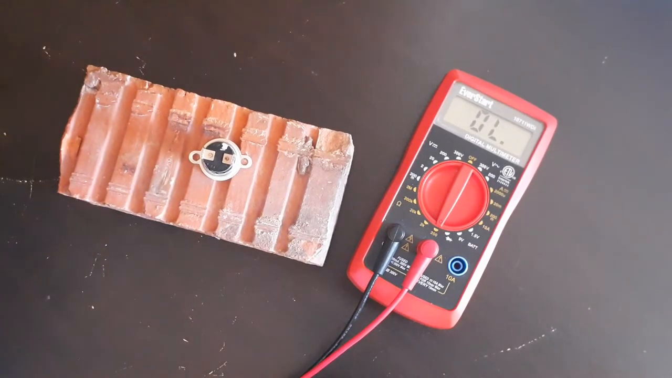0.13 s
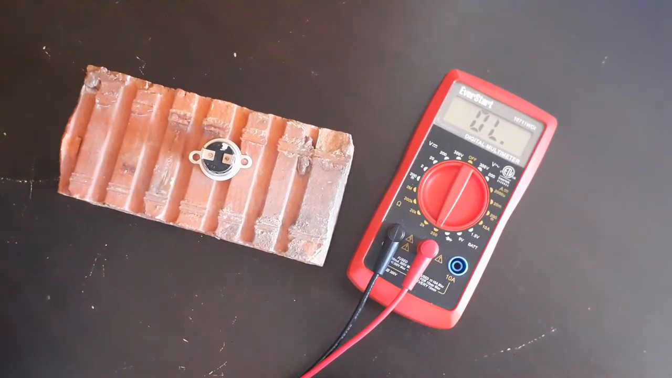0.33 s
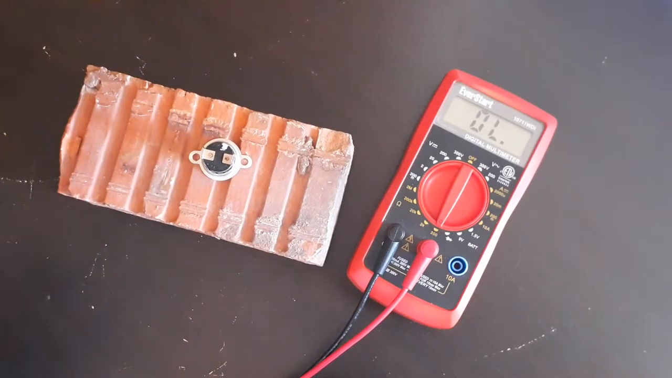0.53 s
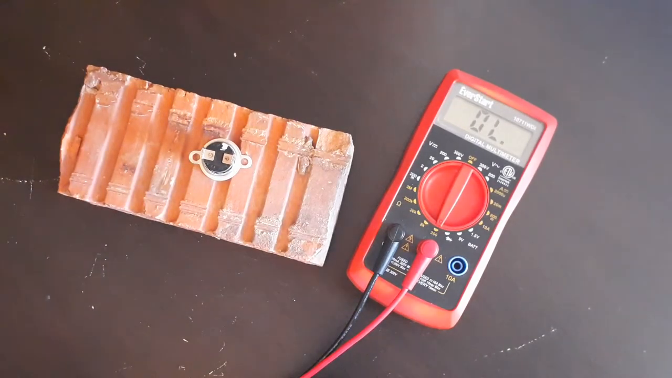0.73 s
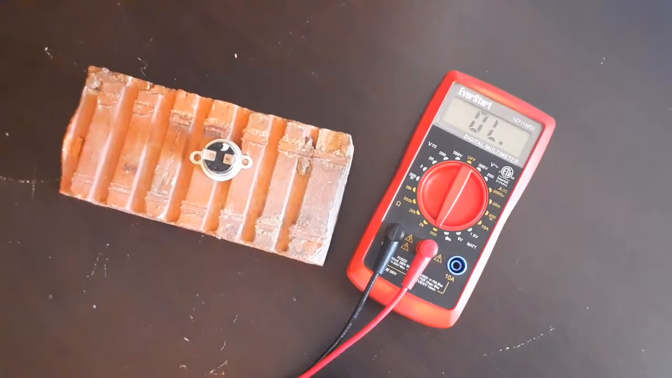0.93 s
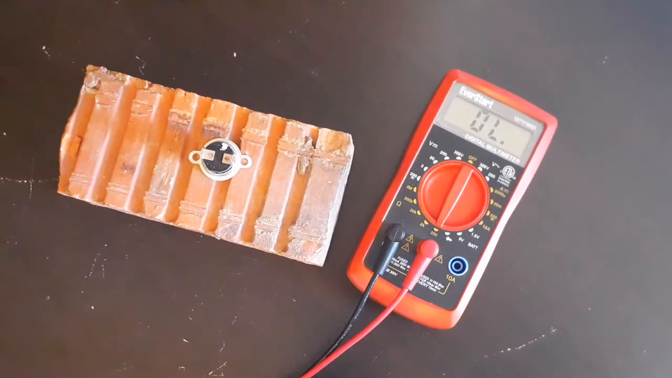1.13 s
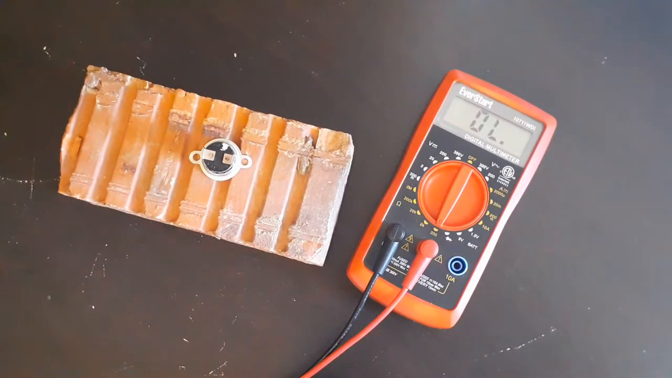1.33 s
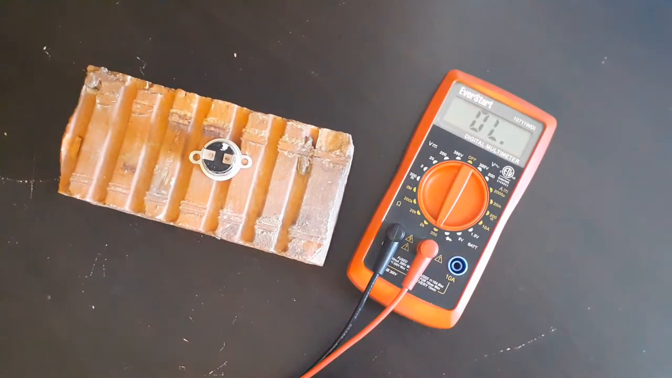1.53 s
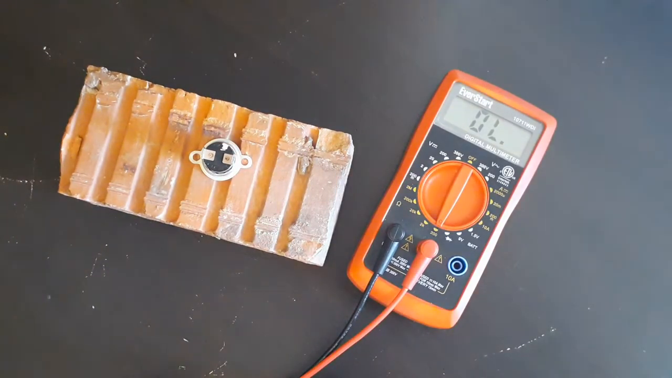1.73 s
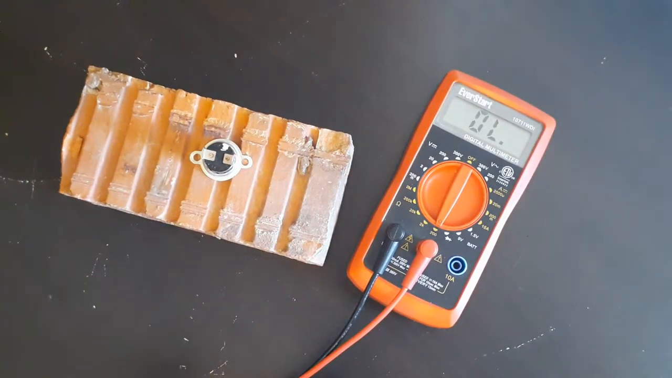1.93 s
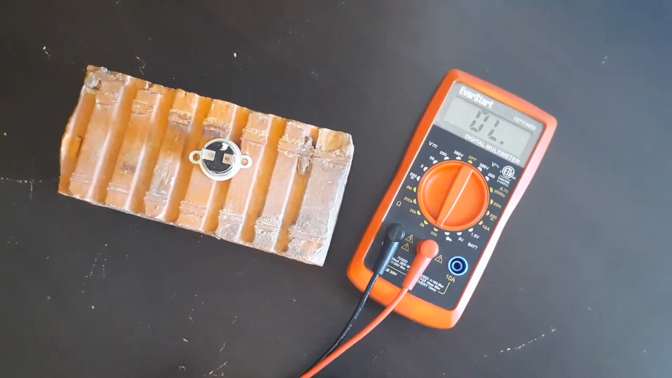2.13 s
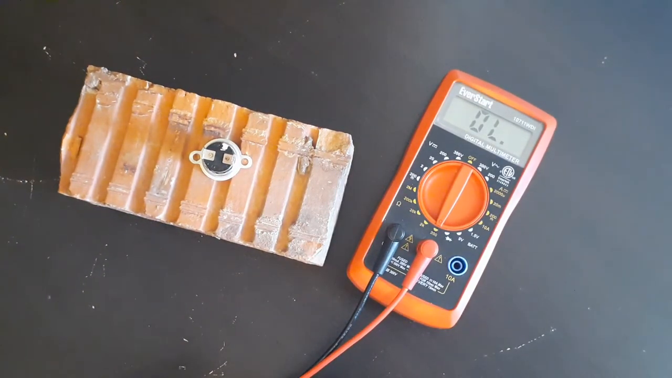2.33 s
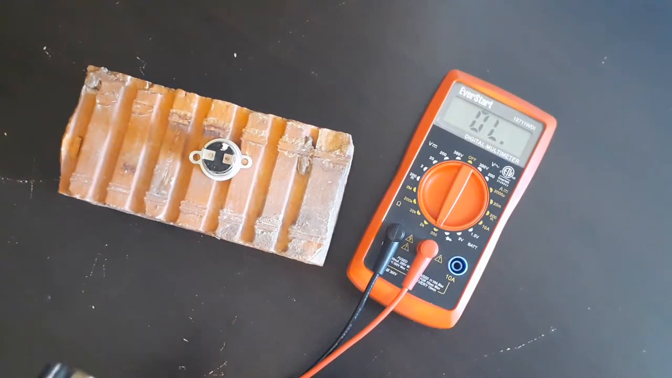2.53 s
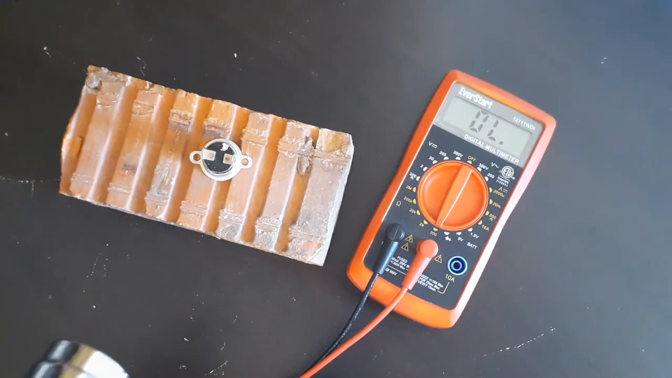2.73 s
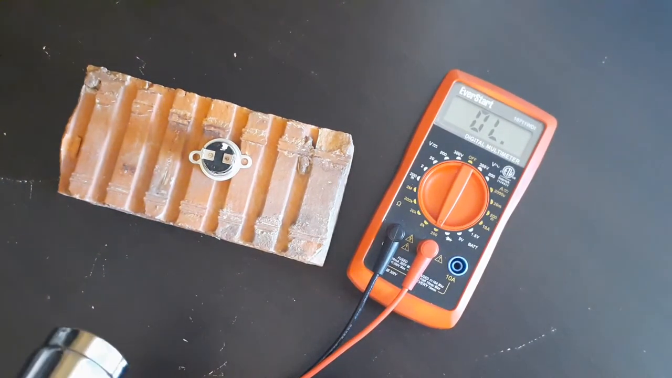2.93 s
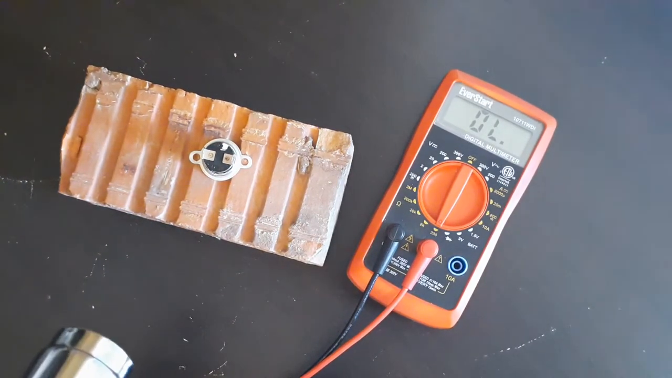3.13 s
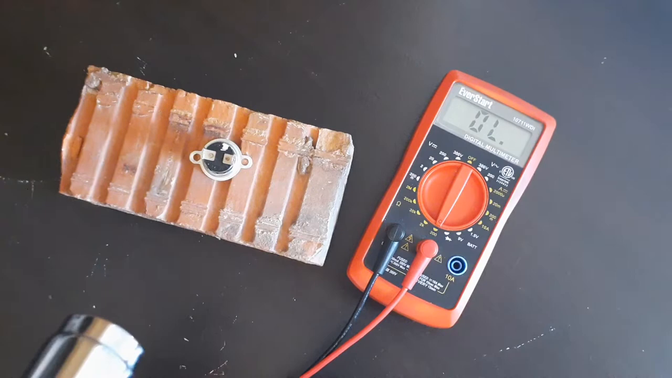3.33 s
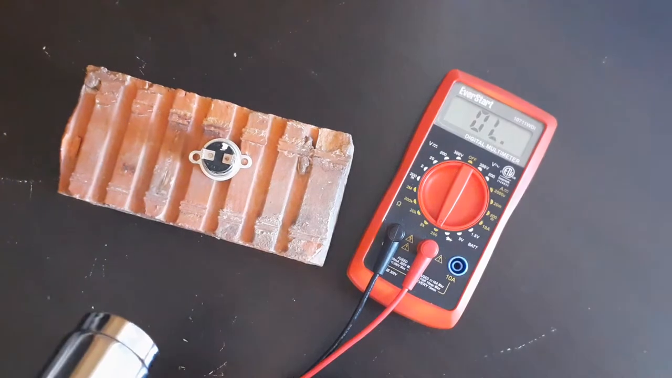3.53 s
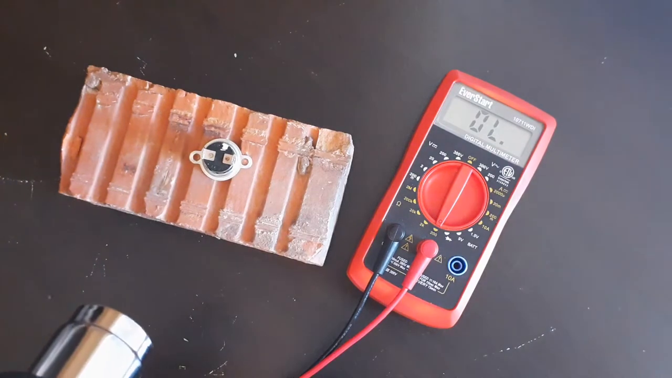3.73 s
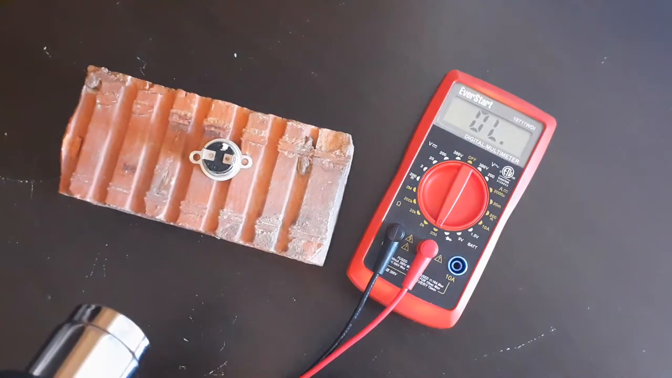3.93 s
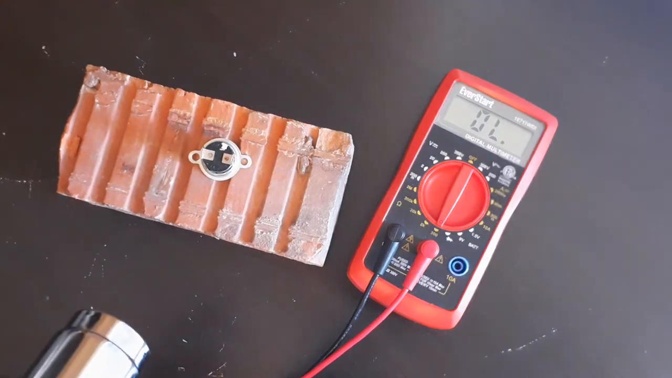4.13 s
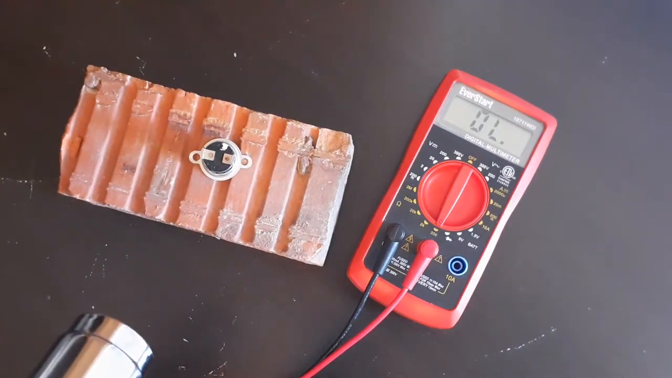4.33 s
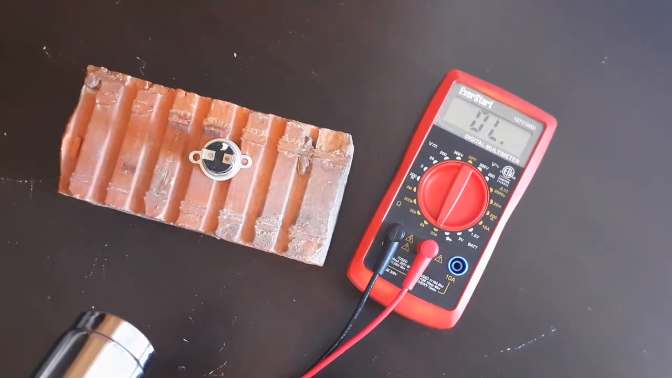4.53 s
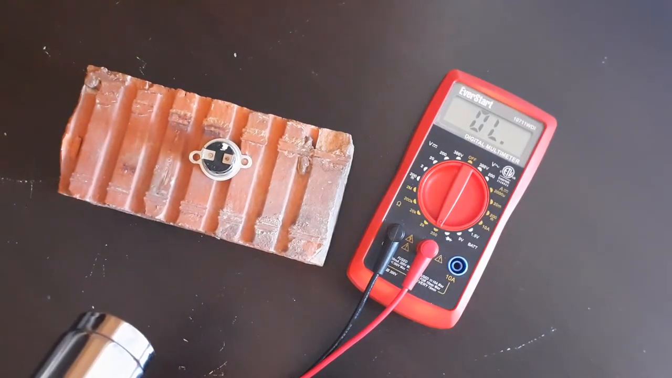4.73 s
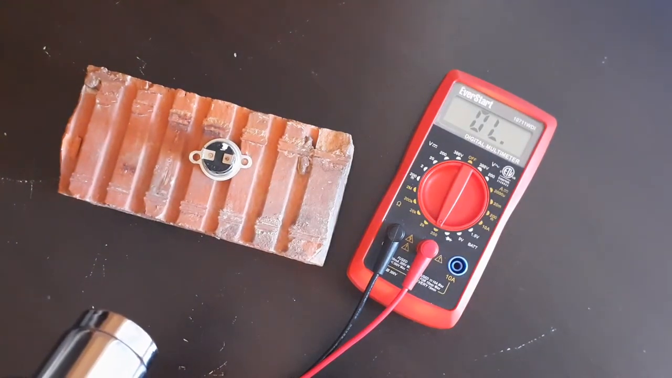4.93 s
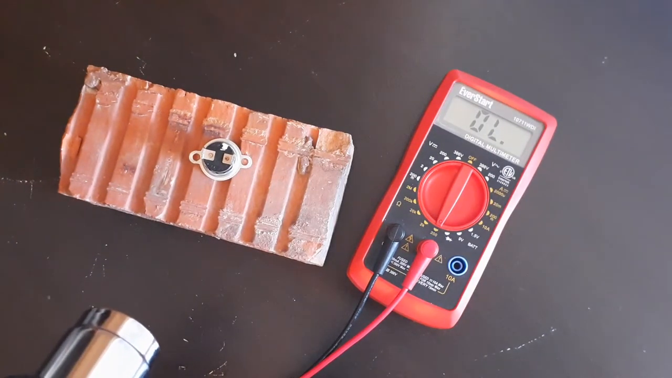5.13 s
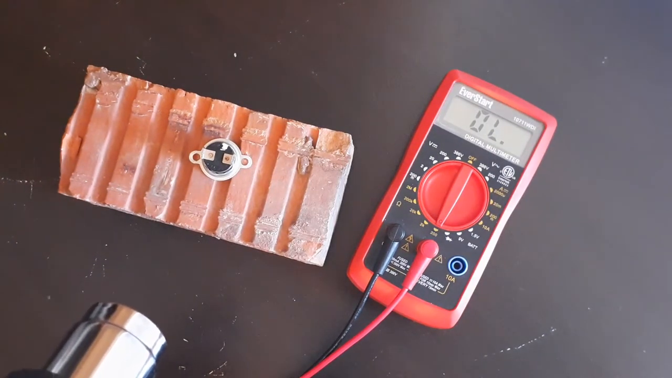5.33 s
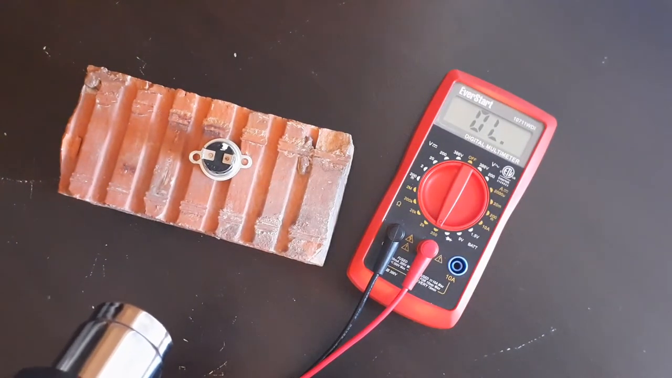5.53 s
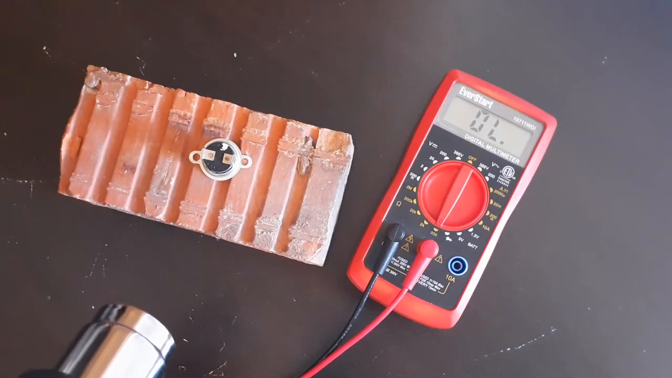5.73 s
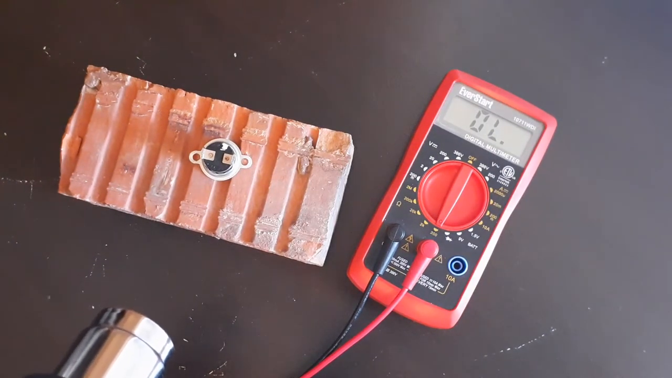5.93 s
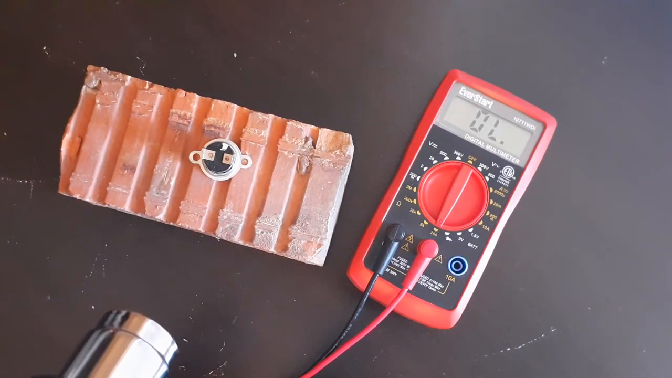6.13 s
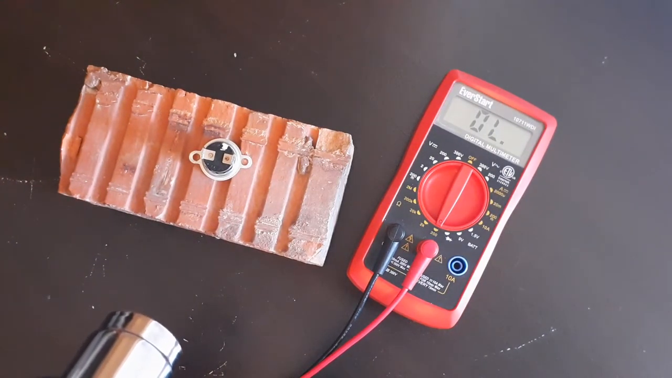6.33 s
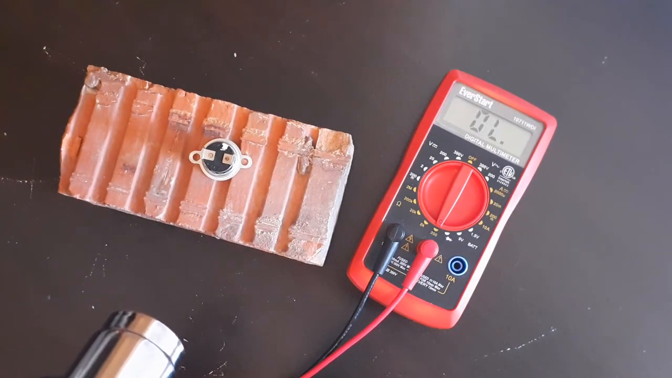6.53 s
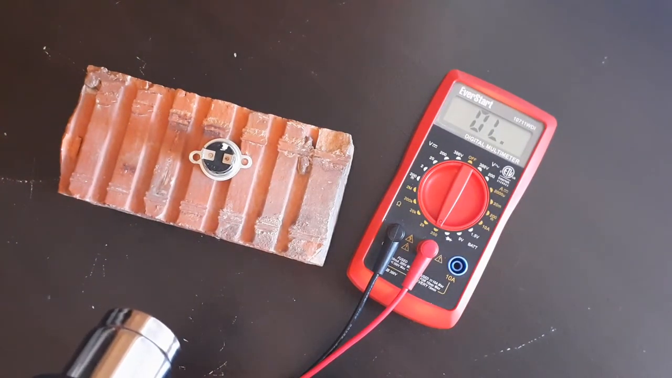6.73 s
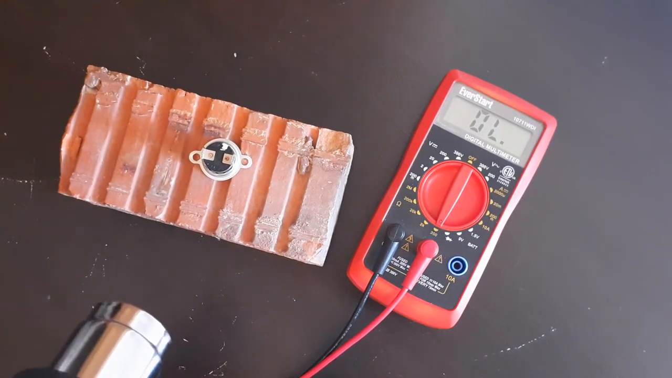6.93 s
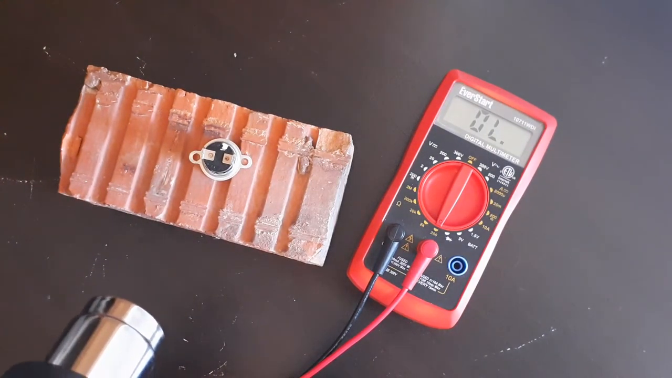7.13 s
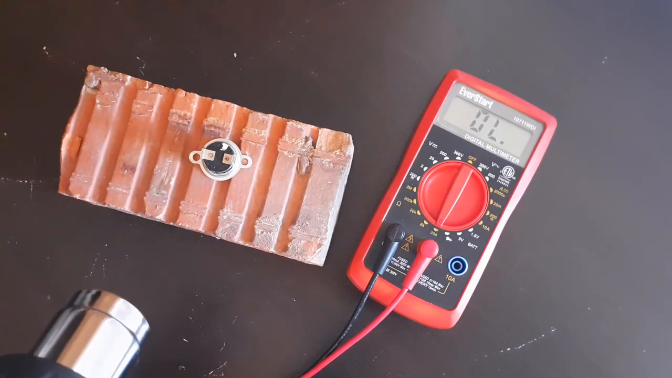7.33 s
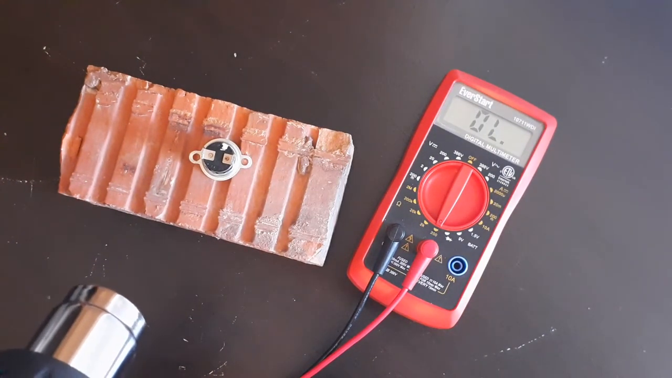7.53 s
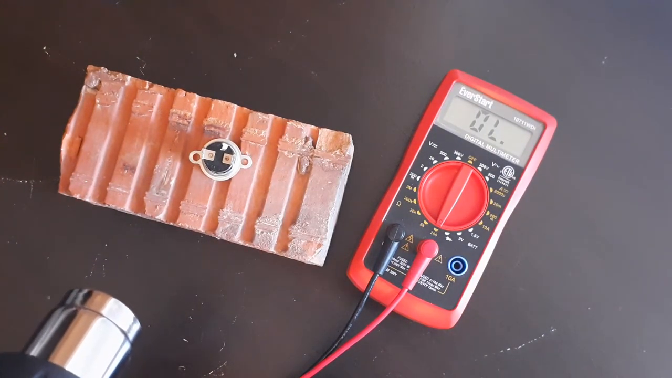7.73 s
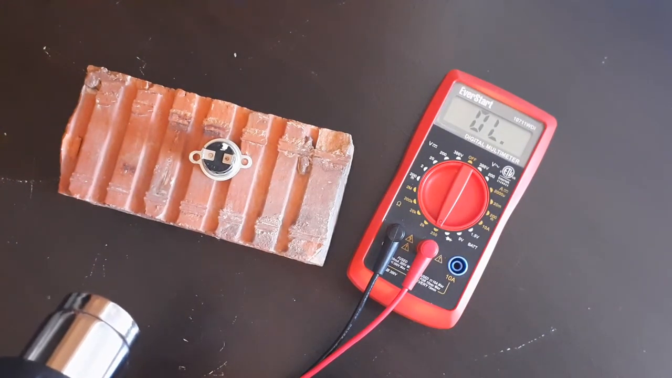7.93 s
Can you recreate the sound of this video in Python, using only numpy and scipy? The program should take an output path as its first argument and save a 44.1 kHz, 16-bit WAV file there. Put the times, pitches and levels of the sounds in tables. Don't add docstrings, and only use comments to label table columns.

```python
import sys
import numpy as np
from scipy import signal
from scipy.fft import rfft, irfft, next_fast_len
from scipy.io import wavfile

SR = 44100
rng = np.random.default_rng(int(sys.argv[2]) if len(sys.argv) > 2 else 0)


def invert_db(x):
    u = np.asarray(x, float) / 20
    return 10 ** u


def log_audio(samples):
    frames = np.atleast_2d(samples).T
    limited = np.clip(frames, -1, 1)
    pcm = np.round(limited * 32767).astype(np.int16)
    wavfile.write(sys.argv[1], SR, pcm)


N = 356636
MOTOR_ON_S = 1.6
TOP_TURNS_PER_S = 238.21


def motor():
    speed = rotor_speed()
    turns = np.cumsum(speed) / SR
    tones = hum(speed, turns) + blade_whine(turns) + overtones(speed, turns)
    return np.sqrt(2) * tones * motor_running() + brushes(turns)


# missing_speed [turns per s], time_constant [s]
SPIN_UP = [
    (148.2, .798),
    (70.4, 1.394),
]


def rotor_speed():
    running_s = np.maximum(np.arange(N) / SR - MOTOR_ON_S, 0)
    return TOP_TURNS_PER_S - sum(missing * np.exp(-running_s / lag_s) for missing, lag_s in SPIN_UP)


def motor_running():
    return np.arange(N) > MOTOR_ON_S * SR


# pitch_hz [Hz], width_hz [Hz], left_db [dB], right_db [dB]
HUM_MODES = [(187, 18, -60, -54), (228.5, 12, -44, -64), (233, 8.7, -65, -43.5)]


def hum(speed, turns):
    power = 0
    for pitch_hz, width_hz, left_db, right_db in HUM_MODES:
        power = power + invert_db(ports(left_db, right_db)) ** 2 * resonance(speed, pitch_hz, width_hz)
    return np.sqrt(power) * np.sin(2 * np.pi * turns + ports(0.84, 0))


# time_s [s], left_db [dB], right_db [dB], left_port_lead [cycles]
WHINE = [(1.76, -67, -65, .35), (2.05, -47, -47, .2), (2.33, -49, -41, .25), (2.5, -43, -37, .7),
         (2.74, -35, -37, .12), (3.25, -29, -35, .43), (3.7, -29, -29, .5), (3.84, -28, -28, .69),
         (3.97, -24, -38, .42), (4.14, -28, -26, .33), (4.23, -28, -27, .55), (4.65, -29, -27, .44),
         (4.86, -30, -26, .63), (5.52, -27, -26, .58), (5.72, -30, -24, .5), (5.9, -33, -25, .65),
         (6.88, -33, -28, .64), (7.2, -31, -29, .74)]
# time_s [s], width_s [s], left_db [dB], right_db [dB]
WHINE_FADES = [(2.22, .05, -5, 0), (2.42, .04, -3, -8), (2.87, .04, -5, -4), (3.08, .1, -3, -4),
               (3.44, .05, -3, 0), (3.63, .06, 0, -6), (4.2, .07, -6, 0), (4.55, .08, 0, -3),
               (4.81, .07, -7, 0), (5.2, .2, -3, -3), (5.6, .06, 0, -2), (6.98, .07, -7, -1)]


def blade_whine(turns):
    t = np.arange(N) / SR
    left_db, right_db, lead = in_time(WHINE)
    fade_db = 0
    for time_s, width_s, fade_left, fade_right in WHINE_FADES:
        fade_db = fade_db + ports(fade_left, fade_right) * np.exp(-((t - time_s) / width_s) ** 2)
    flutter = invert_db(1.2 * np.array([drift(14), drift(14)]) + .2)
    lead = lead + .02 * drift(6)
    level = invert_db(np.array([left_db, right_db]) + fade_db) * flutter
    whine = level * np.sin(2 * np.pi * (12 * turns + lead * ports(1, 0)))
    copy_level = invert_db((left_db + right_db) / 2 - 24 + 2 * drift(8))
    return whine + copy_level * np.sin(2 * np.pi * (12 * turns + lead / 2 + .5))


# multiple [times rotor speed], left_db [dB], right_db [dB]
OVERTONES = [(2, -52, -55), (5, -53, -52), (20, -60, -54), (23, -59, -57), (24, -59, -62), (25, -58, -61),
             (36, -61, -58), (40, -61, -66), (41, -60, -63), (42, -62, -65), (53, -64, -69), (61, -63, -69),
             (65, -68, -78)]


def overtones(speed, turns):
    out = np.zeros((2, N))
    wavers = [invert_db(4.4 * drift(7.0)) for _ in range(6)]
    growth = (speed / speed[-1]) ** 5.0
    for k, (multiple, *side_db) in enumerate(OVERTONES):
        for side in range(2):
            phase = 2 * np.pi * (round(multiple) * turns + rng.random())
            waver = wavers[(k + 3 * side) % 6]
            out[side] += invert_db(side_db[side]) * growth * waver * np.sin(phase)
    return out


# pitch_hz [Hz], level_db [dB]
CAN_COLOUR = [(3000, -40), (4900, -13), (5450, 0), (5900, -13), (7500, -13), (8500, -6), (9200, -9),
              (9800, -1), (10500, -12), (12600, -13), (14200, -4), (16000, -12)]
# time_s [s], level_db [dB]
BRUSH_LEVEL = [(1.6, -90), (1.95, -59), (2.3, -51), (2.7, -48), (3.7, -49), (4.6, -53), (8.09, -56)]
STRONG_MULTIPLES = [26, 31, 36, 43, 47, 54, 65]
STRONG_DB = 4.5


def brushes(turns):
    size = 2048
    multiple = np.arange(size // 2 + 1)
    lines = rng.standard_normal((3, 2, len(multiple))) * np.exp(-(multiple / 115) ** 2)
    lines = lines * invert_db(STRONG_DB * np.isin(multiple, STRONG_MULTIPLES))
    patterns = irfft(lines[:, 0] + 1j * lines[:, 1], size)
    place = turns % 1 * size
    contacts = 0
    for pattern in patterns:
        wear = 1 + .6 * drift(.8)
        contacts = contacts + wear * np.interp(place, np.arange(size), pattern, period=size)
    song = rms_one(coloured(contacts, lambda hz: at_hz(CAN_COLOUR, hz)))
    level_db, = in_time(BRUSH_LEVEL)
    return placed(invert_db(level_db) * song, wet_db=-3.0, bass_wet_db=-8.0)


# time_s [s], level_db [dB]
AIR_LEVEL = [(1.6, -30), (1.8, -23.5), (2.0, -30), (2.2, -33.5), (2.5, -30), (3.0, -30), (3.5, -30),
             (4.0, -29.5), (5.0, -30), (6.0, -30.5), (7.0, -30), (8.09, -30)]
# pitch_hz [Hz], level_db [dB per Hz]
AIR_COLOUR = [(40, -36.5), (110, -18.5), (300, -17), (500, -6), (900, -3), (1600, 0), (2200, -1),
              (2900, -4.5), (4200, -10), (6000, -15.5), (7600, -16.5), (9600, -20.5), (13500, -19.5),
              (15800, -26.5)]
# pitch_hz [Hz], width_hz [Hz], left_db [dB], right_db [dB]
BARREL = [(562, 66, -2.5, 5), (765.4, 40, 11, 7), (990, 170, -2.5, 3.5), (1267, 220, 5, 0),
          (1710, 77, 3, -9), (2280, 19, -1, -17), (2601, 29, 2, 8.5), (3047, 470, 3, 8),
          (3790, 450, 1.5, 6.5), (4135, 270, 5, 3.5), (4910, 73, -1.5, 11.5), (5380, 210, 3, 3),
          (8620, 920, 11, 8)]
# [dB, negative = notch]
STANDING_WAVES = [(707, 70, -4), (1092, 18, 2.5), (1140, 50, -8), (1262, 15, 1.5), (1382, 13, 0.5),
                  (1522, 23, 5), (1625, 32, 3.5), (1726, 67, -4.5), (1870, 26, 6), (1940, 60, 2),
                  (2080, 30, 8), (2130, 51, -7.5), (2520, 54, 2)]
# upper_edge_hz [Hz], growth [power of speed]
AIR_GROWTH = [(950, 1.9), (2300, 2.41), (6500, 2.95), (10500, 3), (22050, 7)]


def air():
    def resonances_db(hz):
        level = 0
        for pitch_hz, width_hz, left_db, right_db in BARREL:
            level = level + ports(left_db, right_db) * resonance(hz, pitch_hz, width_hz)
        for pitch_hz, width_hz, db in STANDING_WAVES:
            level = level + db * resonance(hz, pitch_hz, width_hz)
        return level

    speed = rotor_speed()
    rush_db, = in_time(AIR_LEVEL)
    rush = coloured(spread(AIR_COLOUR), resonances_db)
    below, out = 0, 0
    for edge_hz, power in AIR_GROWTH:
        up_to = coloured(rush, lambda hz: -10 * np.log10(1 + (hz / edge_hz) ** 6))
        out = out + (up_to - below) * (speed / speed[-1]) ** power * invert_db(.5 * drift(29))
        below = up_to
    return out * invert_db(rush_db + 0.21 * drift(11.0)) * motor_running()


# time_s [s], level_db [dB], housing_ring_hz [Hz]
SWITCH = [
    (1.3410, -27.5, 4020),
    (1.5560, -20, 3120),
]
# pitch_hz [Hz], level_db [dB]
SNAP_COLOUR = [(300, -32), (600, -4), (1200, -3.5), (2000, 7), (4800, 6), (7000, -0.5), (9000, 6),
               (16000, -5)]
RATTLE_S, RATTLE_DB = 0.0045, 0.5
RING_T60_S, RING_DB = 0.022, -3.5


def switch():
    tick, housing = np.zeros(N), np.zeros((2, N))
    grit = spread(SNAP_COLOUR)
    t = np.arange(2000) / SR
    rattle_shape = np.exp(-t / RATTLE_S) * np.minimum(t / 0.0021, 1)
    for time_s, db, ring_hz in SWITCH:
        at = round(time_s * SR)
        tick[at] = invert_db(db)
        housing[:, at - 30:at + 1970] += invert_db(db + RATTLE_DB) * grit[:, at:at + 2000] * rattle_shape
        housing += ring(invert_db(db + RING_DB) * (np.arange(N) == at), ring_hz, RING_T60_S)
    tick = coloured(tick, lambda hz: at_hz(SNAP_COLOUR, hz) + 17.3)
    return (placed(tick, wet_db=16.0, bass_wet_db=10.0) + housing) * invert_db(ports(-.5, .5))


# peak_s [s], rise_s [s], fall_s [s], scrape_db [dB], board_db [dB above the scrape]
DRAGS = [
    (.18, .13, 0.17, -37.5, 5.5),
    (.08, 0.057, 0.11, -51, 13.5),
    (.42, 0.7, 0.14, -52.5, 9),
    (.56, 0.0065, 0.33, -56, -3),
    (.714, .07, 0.062, -48.5, -6),
    (.85, .2, 0.68, -60.5, -11),
    (1.03, 0.39, 0.091, -64, 10),
    (1.27, .03, 0.016, -59, -27),
]
# peak_s [s], rise_s [s], fall_s [s], level_db [dB]
SHAKES = [
    (1.64, 0.058, 0.36, -52),
    (1.77, 0.19, 0.5, -41.5),
    (1.95, 0.16, .3, -43.5),
    (2.06, .1, .15, -48),
    (2.35, .05, .04, -62),
]
# peak_s [s], rise_s [s], fall_s [s], level_db [dB]
SWAYS = [
    (.2, .3, .4, -63),
    (.76, .2, .5, -62),
    (1.03, .3, .1, -65),
    (1.84, .1, .5, -56),
    (2.05, 0.22, 0.44, -61),
    (2.4, 0.35, 0.19, -53.5),
]
# pitch_hz [Hz], level_db [dB per Hz]
RUMBLE_COLOUR = [(18, -58), (30, -30), (70, -21), (140, 2), (183, -2.5), (211, -14), (274, -7.5),
                 (329, -22), (400, -14), (520, -26), (880, -120)]
SCRAPE_COLOUR = [(180, -25), (300, -10.5), (523, -1), (663, -7.5), (832, -8.5), (975, -16), (1420, -12.5),
                 (2830, -17), (3170, -23.5), (4500, -25), (5850, -37), (9900, -120)]
SHAKE_COLOUR = [(35, -42), (60, -17), (124, 3.5), (296, -7.5), (325, -7), (483, -13.5), (626, -12),
                (678, -30), (900, -16), (1170, -38), (1980, -120)]
SWAY_COLOUR = [(20, -32), (40, -11), (56, 0), (75, 0), (110, -19), (300, -70)]


def housing_on_table():
    board = strokes([(s, rise, fall, db + board_db) for s, rise, fall, db, board_db in DRAGS])
    lumps = invert_db(1.8 * drift(18))
    rumble = lumps * (strokes(SHAKES) * noise(SHAKE_COLOUR) + board * noise(RUMBLE_COLOUR))
    sway = strokes(SWAYS) * noise(SWAY_COLOUR)
    grains = invert_db(1.5 + 3.4 * drift(50))
    scrape = strokes([row[:4] for row in DRAGS]) * grains * noise(SCRAPE_COLOUR)
    return placed(rumble + sway + scrape, wet_db=-1.5, bass_wet_db=-12.0) * invert_db(ports(-1.2, 1.2))


STROKE_SPAN_DB = 20


def strokes(rows):
    t = np.arange(N) / SR
    power = 0
    for peak_s, rise_s, fall_s, db in rows:
        away = np.maximum((peak_s - t) / rise_s, (t - peak_s) / fall_s)
        power = power + invert_db(db - STROKE_SPAN_DB * away) ** 2
    return np.sqrt(power)


# pitch_hz [Hz], level_db [dB per Hz]
HISS_COLOUR = [(1500, -9.5), (2500, 1.5), (3300, -9), (4300, -4.5), (5100, -5), (5550, 1), (6000, -8),
               (6900, -10), (7400, 0), (10000, 0.5), (12000, -6.5), (14000, -2), (16000, -15)]


def cord():
    hiss = slides() * invert_db(2.0 + 3.0 * drift(60)) * noise(HISS_COLOUR)
    return placed(hiss, wet_db=-1.0, bass_wet_db=-9.0)


# start_s [s], peak_s [s], fall_s [s], level_db [dB]
SLIDES = [(0.08, 0.147, 0.19, -49.5), (.3, .35, 0.45, -63.5), (.46, 0.474, 0.068, -61),
          (0.555, 0.556, 0.074, -48.5), (0.584, .70, .075, -45.5), (0.7796, 0.78, 0.13, -46.5),
          (0.816, 0.893, 0.076, -50.5), (0.986, 0.987, .08, -51.5), (1.094, 1.097, .06, -66),
          (1.15, 1.156, .08, -64), (1.6, 1.75, 0.35, -58)]
BREAK_LOOSE_DB = -4


def slides():
    t = np.arange(N) / SR
    power = 0
    for start_s, peak_s, fall_s, db in SLIDES:
        swell_db = np.minimum(BREAK_LOOSE_DB * (peak_s - t) / (peak_s - start_s), 0)
        fall_db = STROKE_SPAN_DB * np.maximum(t - peak_s, 0) / fall_s
        power = power + (t > start_s) * invert_db(db + swell_db - fall_db) ** 2
    return np.sqrt(power)


# time_s [s], peak_db [dB]
TICKS = [(0.0774, -50), (0.138, -36), (0.4324, -54), (0.5566, -54), (0.5796, -52), (0.601, -56),
         (0.7806, -39), (0.9882, -35), (1.0944, -46), (1.1533, -44), (1.2466, -53)]
# time_s [s], level_db [dB], pitch_hz [Hz], ring_down_s [s to fall 60 dB]
KNOCKS = [
    (1.249, -42.5, 614, 0.058),
    (1.264, -40.5, 810, 0.035),
    (1.4, -51, 1100, .06),
    (2.326, -33, 107, 0.24),
    (2.385, -58, 69.6, 0.36),
]


def ticks_and_knocks():
    ticks = np.zeros(N)
    for time_s, db in TICKS:
        at = round(time_s * SR)
        ticks[at:at + 400] += invert_db(db + 2.0) * rng.standard_normal(400) * np.exp(-np.arange(400) / 60)
    ticks = signal.sosfilt(signal.butter(2, 2500, "high", fs=SR, output="sos"), ticks)
    knocks = 0
    for time_s, db, hz, t60 in KNOCKS:
        soft = signal.butter(2, 2.1 * hz, fs=SR, output="sos")
        hit = invert_db(db) * (np.arange(N) == round(time_s * SR))
        knocks = knocks + signal.sosfilt(soft, ring(hit, hz, t60))
    return placed(ticks + knocks, wet_db=8.5, bass_wet_db=-33.0)


# pitch_hz [Hz], level_db [dB per Hz]
FLOOR_COLOUR = [(18, -31), (30, 9), (115, 16), (526, -36), (822, -8), (1390, -58), (1810, 8), (6380, -10),
                (8740, -2), (16000, -22)]


def room_floor():
    return invert_db(-69) * spread(FLOOR_COLOUR)


PORT_LAG = 8
# pitch_hz [Hz], ring_down_s [s to fall 60 dB]
ROOM_T60 = [(100, 0.36), (500, 0.25), (1300, 0.54), (3500, 0.38), (9000, 0.2), (16000, 0.14)]


def placed(x, wet_db, bass_wet_db):
    t = np.arange(SR // 2) / SR
    edges = np.geomspace(60, 17000, num=9)
    tail = 0
    for low, high in zip(edges, edges[1:]):
        band_filter = signal.butter(1, [low, high], "band", fs=SR, output="sos")
        band = signal.sosfilt(band_filter, rng.standard_normal((2, len(t))))
        hz = np.sqrt(low * high)
        share_db = np.interp(np.log(hz), np.log([150, 900]), [bass_wet_db, 0])
        tail = tail + band * invert_db(share_db - 60 * t / at_hz(ROOM_T60, hz))
    tail = tail * np.clip(t / 0.0014 - .5, 0, 1)
    tail = tail / np.sqrt(np.sum(tail ** 2, axis=1, keepdims=True))
    direct = np.stack([x, np.r_[np.zeros(PORT_LAG), x[:-PORT_LAG]]])
    wet = signal.fftconvolve(x[None], tail, axes=1)[:, :N]
    return (direct + invert_db(wet_db) * wet) / np.sqrt(1 + invert_db(wet_db) ** 2)


# pitch_hz [Hz], shared_part [0 to 1]
LIKENESS = [(60, .94), (250, .88), (600, .65), (1200, .5), (2500, .65), (5000, .55), (8000, .42),
            (16000, .4)]


def spread(points):
    def part_db(hz, own):
        shared_part = np.clip(at_hz(LIKENESS, hz), .01, .99)
        return at_hz(points, hz) + 10 * np.log10(np.abs(own - shared_part))

    source = rng.standard_normal(N)
    shared = coloured(np.stack([source, np.roll(source, PORT_LAG)]), lambda hz: part_db(hz, 0))
    separate = coloured(rng.standard_normal((2, N)), lambda hz: part_db(hz, 1))
    return rms_one(shared + separate)


def noise(points):
    return rms_one(coloured(rng.standard_normal(N), lambda hz: at_hz(points, hz)))


def ring(clicks, hz, t60):
    r, w = invert_db(-60 / (t60 * SR)), 2 * np.pi * hz / SR
    return signal.lfilter([0, np.sin(w)], [1, -2 * r * np.cos(w), r * r], clicks + 1e-18)


def resonance(hz, centre_hz, width_hz):
    return 1 / (1 + (2 * (hz - centre_hz) / width_hz) ** 2)


def drift(rate):
    r = np.exp(-80 * np.pi * rate / SR)
    slow = signal.lfilter([1], [1, -2 * r, r * r], rng.standard_normal(N // 40 + 2002))[2000:]
    return np.interp(np.arange(N) / 40, np.arange(len(slow)), rms_one(slow))


def coloured(x, db_at):
    size = next_fast_len(N)
    gain = invert_db(db_at(np.fft.rfftfreq(size, 1 / SR)))
    return irfft(rfft(x, size) * gain, size)[..., :N]


def at_hz(points, hz):
    pitch_hz, value = np.transpose(points)
    return np.interp(np.log(hz + 1), np.log(pitch_hz), value)


def in_time(rows):
    time_s, *columns = np.transpose(rows)
    return [np.interp(np.arange(N) / SR, time_s, column) for column in columns]


def ports(left, right):
    return np.array([[left], [right]])


def rms_one(x):
    return x / np.sqrt(np.mean(x ** 2) + 1e-20)


def scene():
    handling = housing_on_table() + cord() + ticks_and_knocks()
    return motor() + air() + switch() + handling + room_floor()


def top_cut(x):
    return signal.sosfilt(signal.butter(12, 16530, fs=SR, output="sos"), x)


def record(dry):
    finished = coloured(dry, lambda hz: -90 * (hz > 15760))
    return top_cut(finished)


dry = scene()
out = record(dry)
log_audio(out)
```